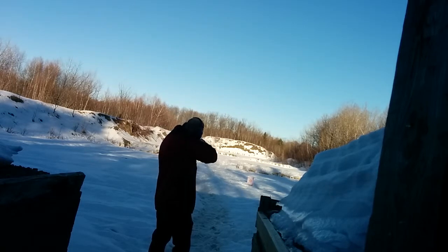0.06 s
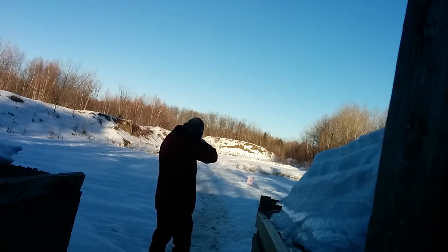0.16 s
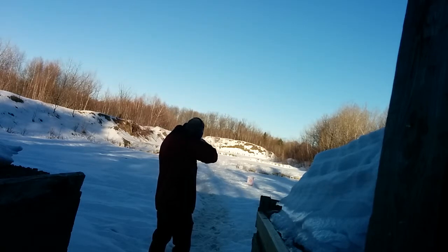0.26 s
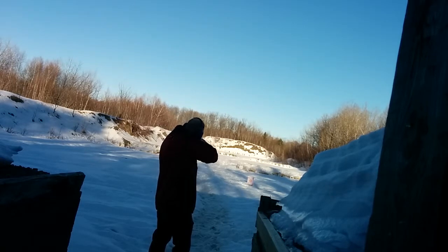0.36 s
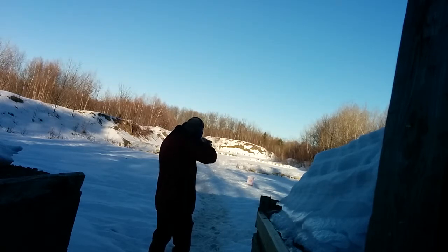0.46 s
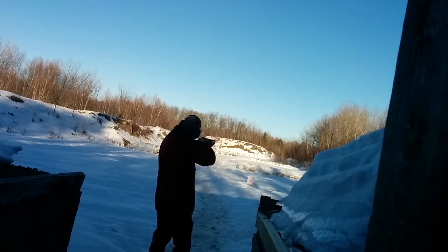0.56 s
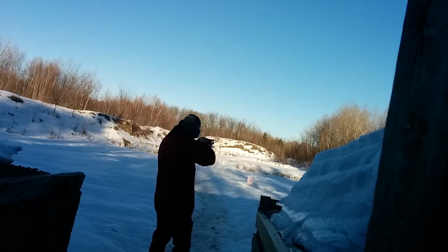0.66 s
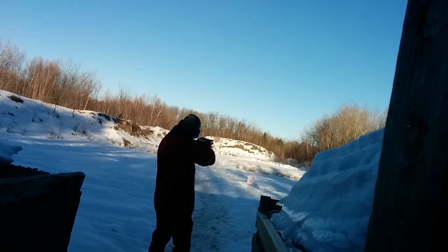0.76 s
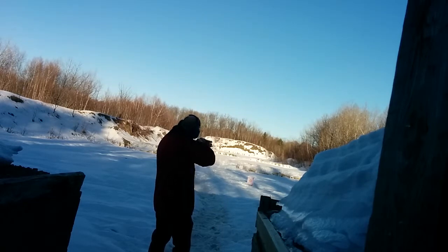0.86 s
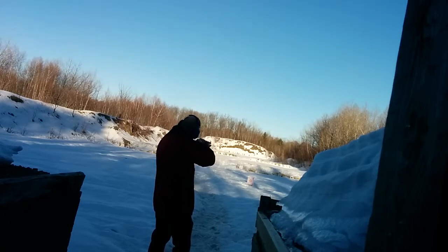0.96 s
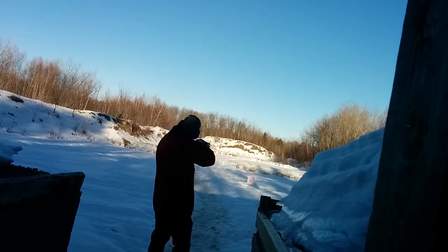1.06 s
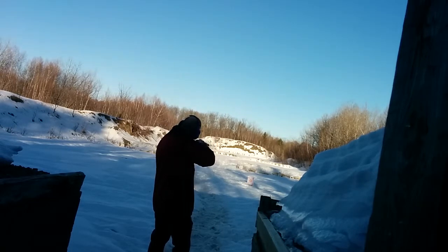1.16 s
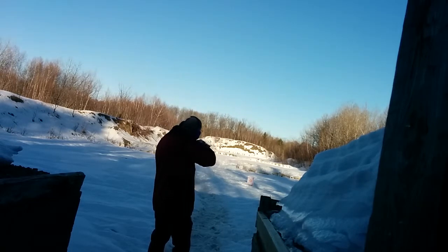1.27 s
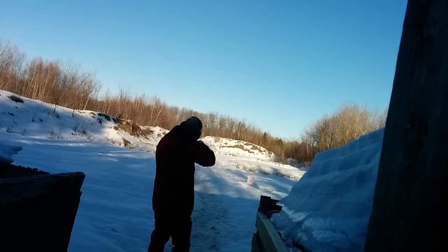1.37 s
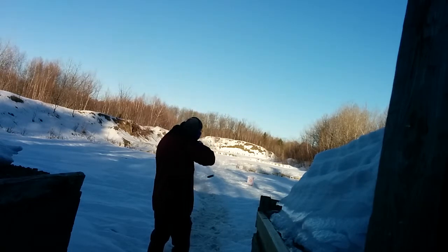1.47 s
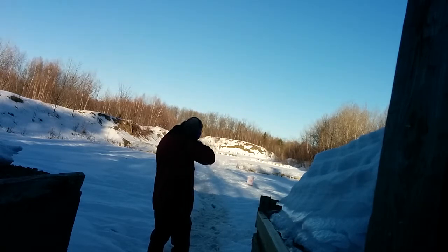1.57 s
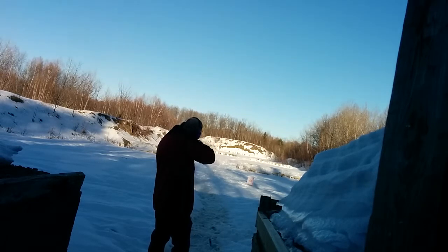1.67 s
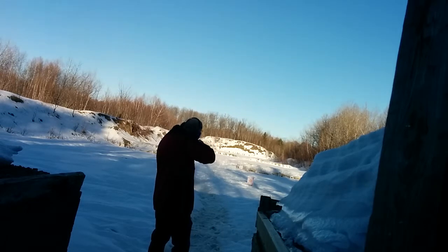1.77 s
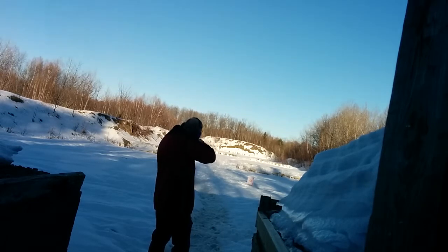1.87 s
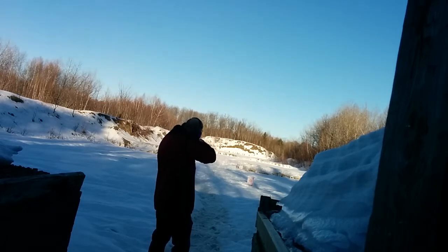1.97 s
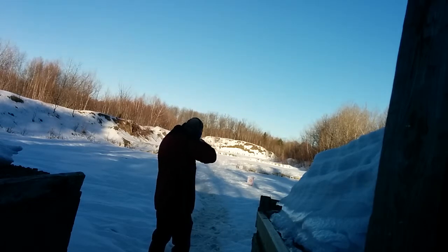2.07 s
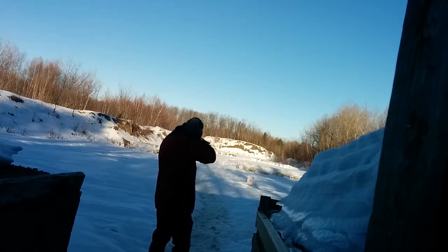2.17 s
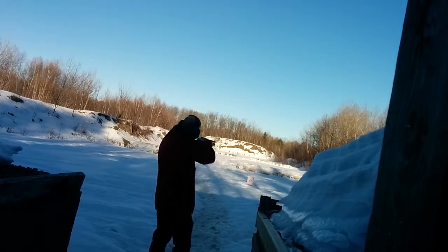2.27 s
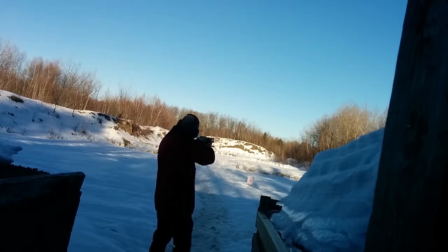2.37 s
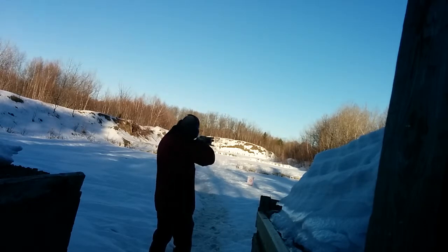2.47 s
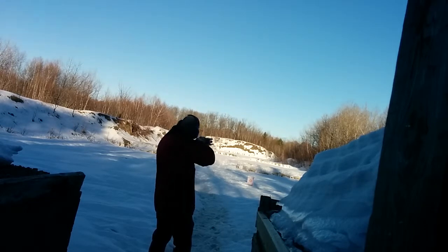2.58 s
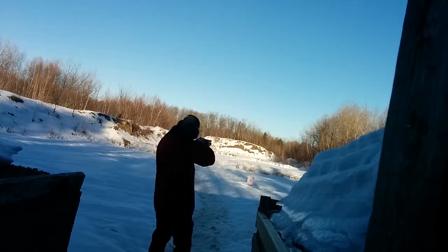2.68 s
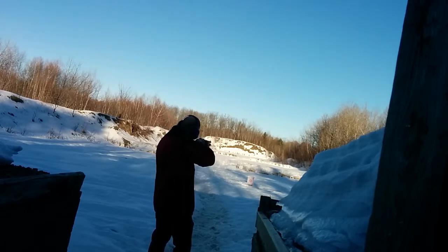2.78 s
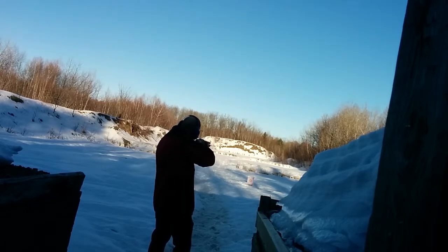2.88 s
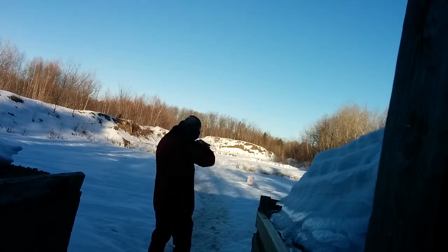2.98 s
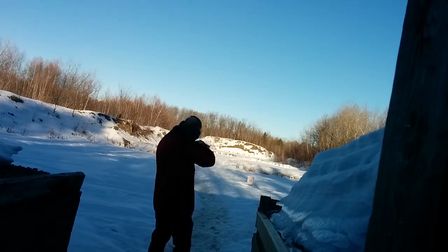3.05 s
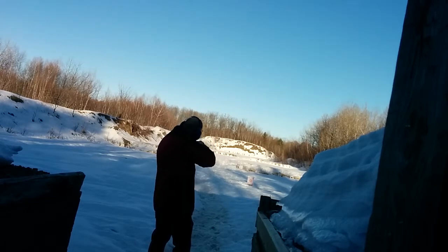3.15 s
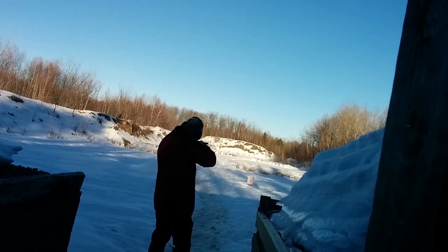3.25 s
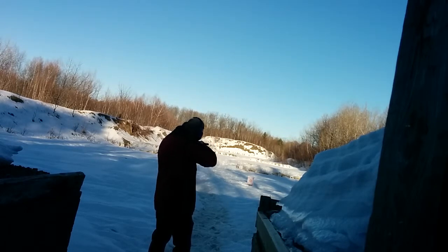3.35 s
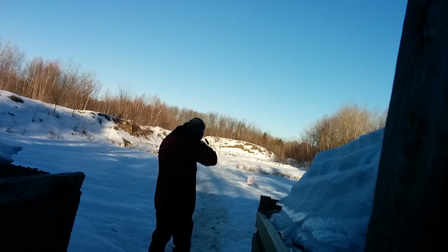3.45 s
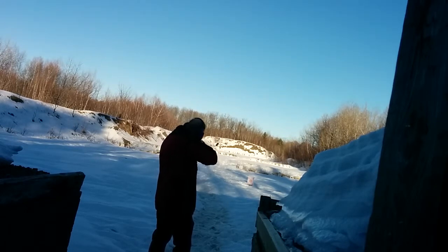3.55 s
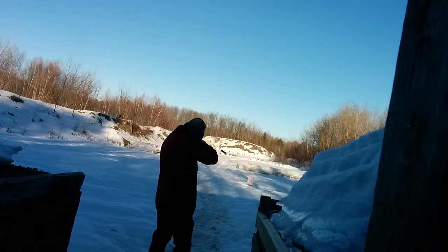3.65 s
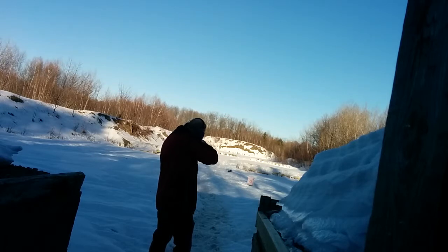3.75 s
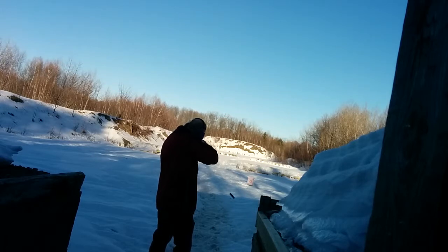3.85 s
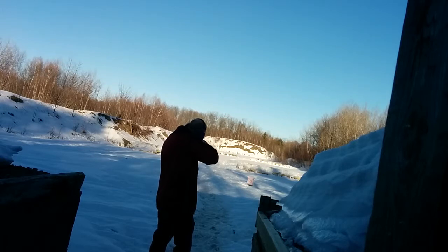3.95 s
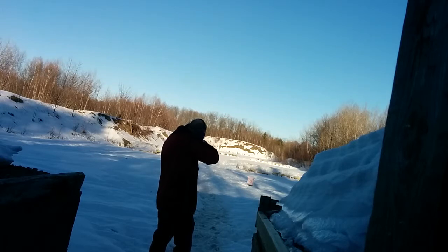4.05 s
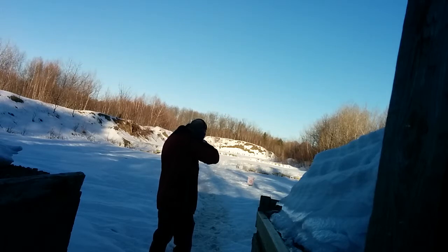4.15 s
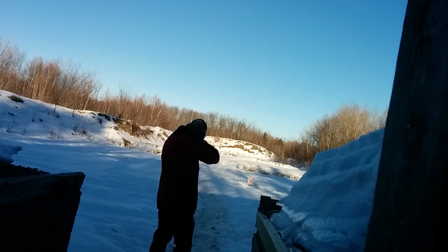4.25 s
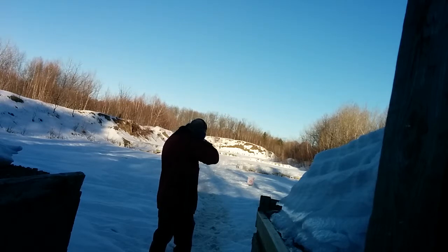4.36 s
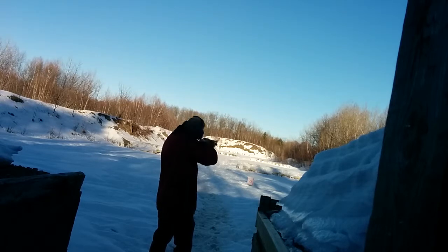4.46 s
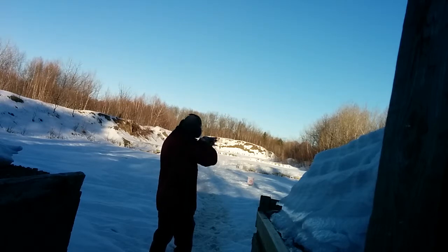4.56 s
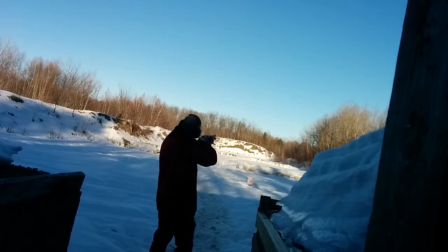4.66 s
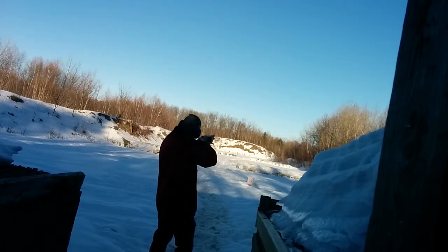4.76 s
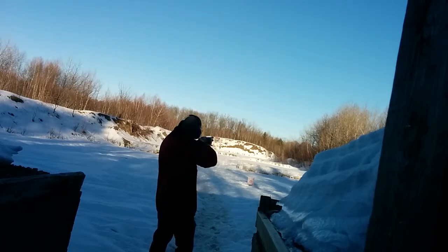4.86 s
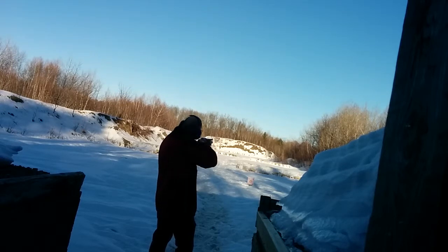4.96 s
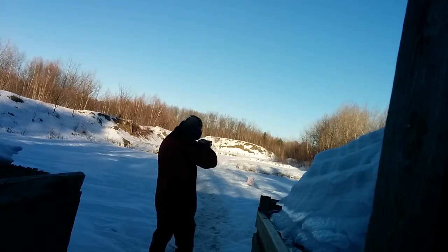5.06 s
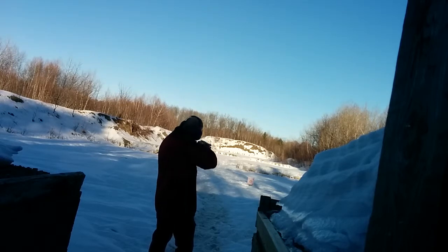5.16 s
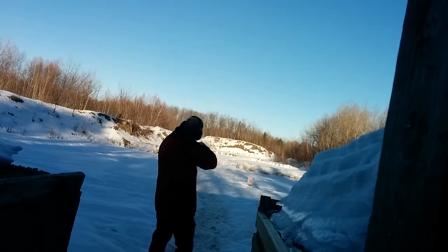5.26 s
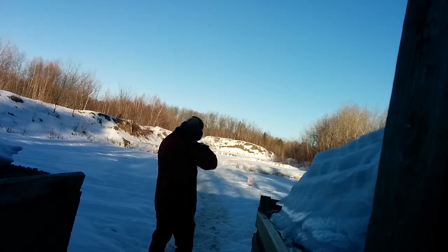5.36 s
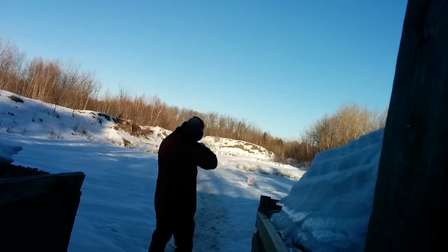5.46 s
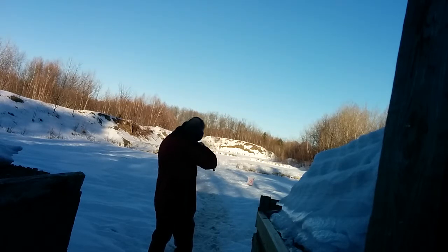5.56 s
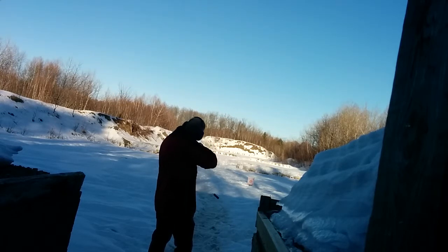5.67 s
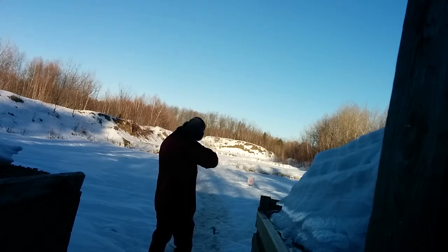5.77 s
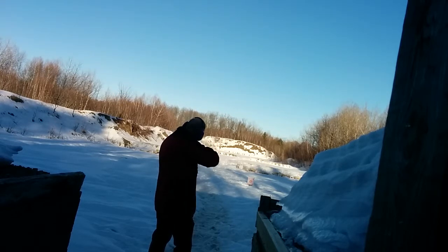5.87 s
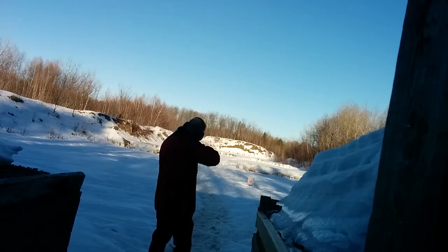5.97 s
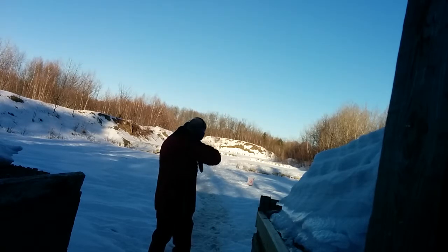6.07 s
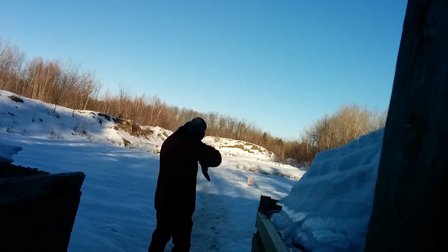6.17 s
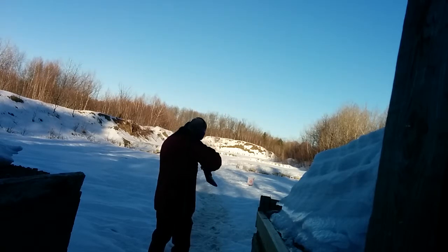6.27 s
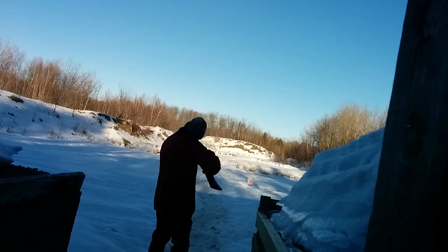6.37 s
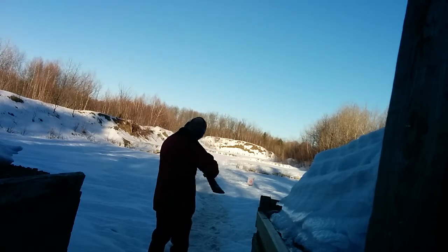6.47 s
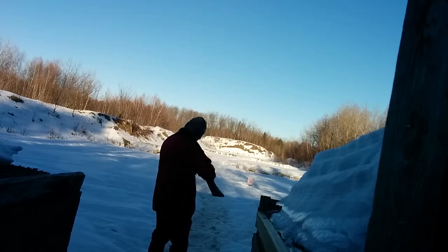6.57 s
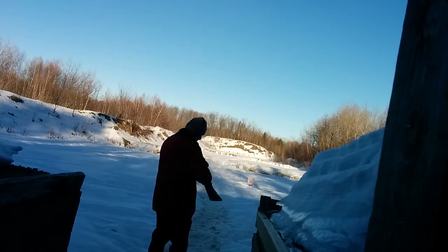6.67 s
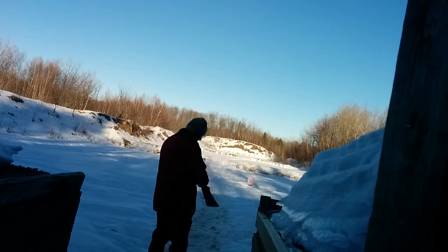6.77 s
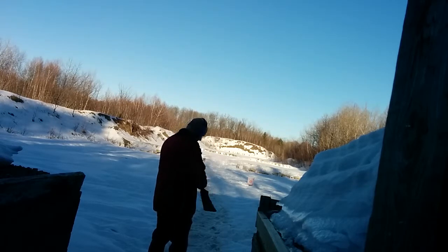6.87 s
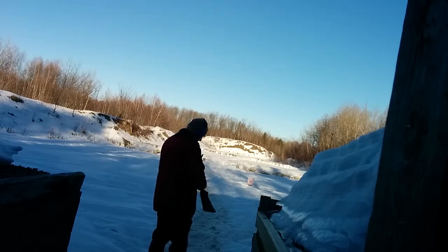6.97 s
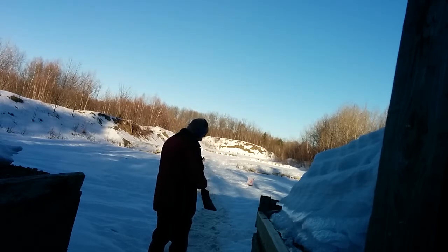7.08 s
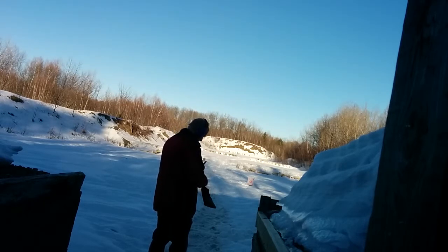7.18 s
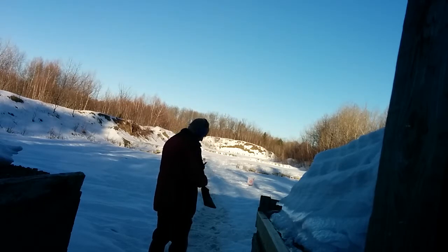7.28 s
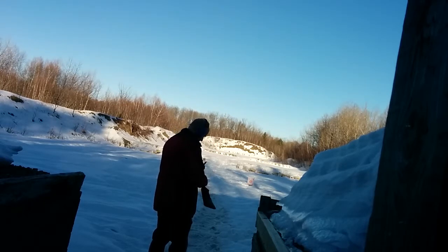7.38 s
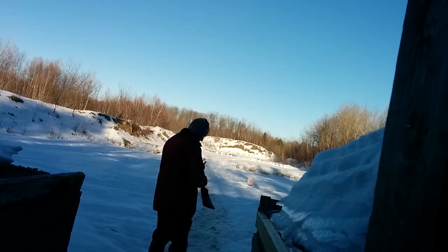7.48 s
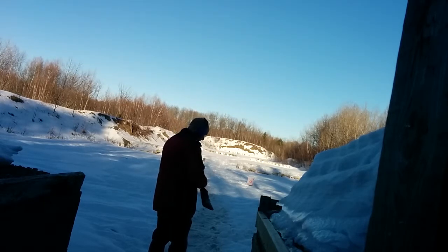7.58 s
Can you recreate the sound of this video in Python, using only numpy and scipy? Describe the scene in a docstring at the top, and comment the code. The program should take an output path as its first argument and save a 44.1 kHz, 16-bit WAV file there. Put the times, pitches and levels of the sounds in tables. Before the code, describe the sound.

In an open snowy pit, a phone a few metres behind the shooter catches three distorted shotgun blasts. Each cracks hard, returns as lumpy echoes and darkens into distant woods. Bright two-part metallic pump strokes cut through each tail. Dry, hollow snow crunches come before the first shot and between the first two. The end is quiet, with clicks, ticks and a final clack; tails are trimmed down to a low, faint air murmur.

```python
"""In a snowy pit, a few metres in front of a phone, a pump shotgun is fired three times.
Each blast is banded noise that overloads the microphone and rolls back from banks and woods, losing
treble; the tail of an earlier shot opens the scene. Noise bursts and short rings make the steel action
slide, clack and tick, and hollow grains of noise make boots crunch in dry snow.
The phone turns quiet moments down, so tails are cut short over a faint low murmur."""
import sys
import numpy as np
from scipy import signal
from scipy.fft import rfft, irfft, next_fast_len
from scipy.io import wavfile
from scipy.ndimage import uniform_filter1d, minimum_filter1d

SR = 44100
rng = np.random.default_rng(int(sys.argv[2]) if len(sys.argv) > 2 else 0)


def store_wav(level_fs):
    """Save 16-bit WAV to argv[1]."""
    pcm = np.round(np.clip(np.atleast_2d(level_fs), -1, 1) * 32767)
    wavfile.write(sys.argv[1], SR, pcm.T.astype(np.int16))


N = 336483
T = np.arange(N) / SR  # seconds

# The shots; the first was fired before the start and only its tail is left. Each row: time in seconds,
# late tail from the woods in dB, sharp echoes in dB, deep boom in dB.
SHOTS = [(-1.62, 2.5, 0, 0), (0.5174, 1.2, -1.5, 0.5), (2.306, -3, 0.6, -16), (4.487, 1.2, -2.5, -9)]
# Strokes of the fore-end, back and forward, each ending at its stop. Each row: main blow in seconds,
# its relative level in dB, looseness in dB, slide before it in seconds, relative end scrape level in dB.
BACK_STROKES = [(1.3985, -6, 4, .045, -32), (3.3977, -5, 3.2, .053, -43), (5.4814, -3.5, -.5, .053, -38),
                (7.3517, -5, -6, .125, -35)]
FORWARD_STROKES = [(1.6266, -4.5, .6, .117, -31.5), (3.6599, -3.5, -.6, .111, -34.5),
                   (5.7474, -5.5, .3, .1, -34)]
# Colour of the steel's scrape and crack. Each row: frequency in Hz, level in dB.
STEEL_COLOUR = [(1000, -19), (2200, 3), (3500, 2.5), (5200, 4.5), (6800, -0.5), (8000, -22.5), (14000, -39)]


def undb(db):
    """Turn decibels into an amplitude factor."""
    return 10 ** (np.asarray(db) / 20)


def shaped_noise(gain, size):
    """Filter white noise by a gain per frequency bin."""
    return irfft(rfft(rng.standard_normal(size)) * gain, size)


def band(hz, octaves, size):
    """Noise of rms 1 under a bell-shaped band, down to 1/e at this many octaves from its centre."""
    padded = next_fast_len(size, True)
    bins = np.fft.rfftfreq(padded, 1 / SR) + 1
    bell = np.exp(-(np.log2(bins / hz) / octaves) ** 2)
    x = shaped_noise(bell, padded)[:size]
    return x / np.std(x)


def coloured(spectrum, size):
    """Noise of rms 1 with a spectrum drawn through (Hz, dB) points."""
    hz, db = np.transpose(spectrum)
    bins = np.fft.rfftfreq(size, 1 / SR) + 1
    x = shaped_noise(undb(np.interp(np.log(bins), np.log(hz), db)), size)
    return x / np.std(x)


def walk(rate):
    """Random levels around 0, drawn `rate` times a second and joined by ramps."""
    k = int(SR / rate)
    steps = np.repeat(rng.standard_normal(N // k + 1), k)
    return uniform_filter1d(steps, k)[:N]


def fade(t, t60, rise):
    """A quick rise and an exponential fall of 60 dB in t60 seconds."""
    return (1 - np.exp(-t / rise)) * undb(-60 * t / t60)


def add(out, s, x):
    """Lay sound x into out from s seconds on."""
    i = int(s * SR)
    out[i:i + len(x)] += x[:N - i]


def blast_roll():
    """Slopes send the blast back; on longer paths the air and snow take more of the bass and treble."""
    # What the ground sends back. Each row: seconds after the shot, middle-register level in dB.
    roll = [(0, -20.5), (0.016, -12), (0.081, -18), (.17, -17.5), (.22, -21.5), (.33, -23), (.54, -33),
            (.556, -28), (.84, -35.5), (.94, -39), (1.03, -47), (1.17, -51), (1.4, -47), (1.6, -52),
            (2.0, -63), (3.2, -88)]
    # Colour of the returns against the roll. Each row: frequency in Hz, near banks in dB, their loss in
    # dB per second, far woods in dB, their loss in dB per unit of the settling path below.
    terrain = np.transpose([(38, -29, 49.5, -42, 10), (62, -21, 49.5, -35.5, 10),
                            (117.8, -13, 49.5, -40.5, 6), (259, -1.2, 44, -18, 2.5),
                            (510, -5.5, 35, -11, -5.5), (835.6, -7.5, 30.5, -6, 1), (1750, -13, 34, -9, 5),
                            (3498, -14.5, 30.5, -9.5, 18.5), (5097, -11, 35, -10, 50),
                            (6707, -5.5, 37, -18, 96), (9000, -5, 44, -47, 66),
                            (16400, -11, 61, -63.5, 72.5)])
    fired, woods_db, _, boom_db = np.transpose(SHOTS)
    last = np.searchsorted(fired, T, "right") - 1
    since = T - fired[last]
    late = np.minimum(since, 1)
    # long paths come from the same far woods, so the colour settles
    path = 1.3 * np.tanh(since ** 1.9 / 1.6)
    # single trees and ledges answer in short lumps, clearest in the low middle
    lumps = np.tanh(walk(110)) + np.tanh(walk(50))
    out = np.zeros(N)
    for hz in 38 * 2 ** np.arange(0, 8.8, 1 / 3):
        near_db, near_loss, far_db, far_loss = (
            np.interp(np.log(hz), np.log(terrain[0]), column) for column in terrain[1:])
        if hz < 90:
            near_db = near_db + .45 * boom_db[last]
        # the pit is small: its own returns hold, then run out, the highest first
        pit_db = -9 * (late / 0.29 * (hz / 8000) ** 0.067) ** 4
        near = undb(near_db - near_loss * since + pit_db)
        far = undb(far_db - far_loss * path + woods_db[last] * late ** 3)
        lump_db = 2.8 * lumps * np.exp(-(np.log2(hz / 650) / 2) ** 2)
        flicker_db = 2.3 * walk(25)
        out += np.hypot(near, far) * undb(lump_db + flicker_db) * band(hz, 1 / 5, size=N)
    return out * undb(np.interp(since, *np.transpose(roll)))


def blast_echoes():
    """Single echoes stand out of the roll as short bands of noise, each with a fainter band above it."""
    # Each row: seconds after the shot, relative level in dB, centre in Hz, 60 dB decay in seconds.
    echoes = [(.083, -10, 60, .13), (.101, -.6, 5200, .018), (.143, -5, 4360, .018),
              (.244, -2.2, 4400, .018), (.261, -9, 4660, .018), (.289, -8, 460, .085),
              (.338, -14, 780, .14), (.546, -11, 580, .17), (.63, -17, 507, .13), (.768, -24, 915, .11)]
    out, t = np.zeros(N), T[:SR // 3]
    for shot, woods, sharp, boom in SHOTS[1:]:
        for s, db, hz, t60 in echoes:
            db = db + (boom if hz < 90 else sharp if hz > 2000 else woods * s)
            noise = band(hz, 0.65, size=len(t)) + undb(-11) * band(2.3 * hz, 0.68, size=len(t))
            add(out, shot + s, undb(db - 5) * fade(t, t60, 0.025 * t60) * noise)
    return out


def shots():
    """A shot is its rolling return from the ground plus the echoes that stand out of it."""
    return blast_roll() + blast_echoes()


def clacks():
    """List every blow of steel on steel: those that end the strokes, and the single clicks."""
    # Blows within a back or forward stroke. Each row: seconds from the main blow, level against it in dB,
    # top sparkle in dB, rattle after the blow in dB.
    back_blows, forward_blows = [(-.01, -13.5, -17, -11), (0, 0, -.6, -19)], [(0, 0, 1.2, -23), (.0093, -2.5, -4, -18)]
    # Single parts click. Each row: seconds, relative level in dB, top sparkle in dB, rattle after in dB.
    blows = list([(1.4298, -12, 0, -16), (1.5319, -29.5, -3, -5.5), (1.5618, -18.5, -5.5, -11),
                  (3.3644, -27.5, -30, -9.5), (3.4184, -20, 2, -12.5), (3.4359, -26, -9, -6),
                  (3.5579, -35, -8.5, -8.5), (3.5775, -21, -3, -9.5), (3.5965, -17, -8, -9.5),
                  (5.658, -32, -18.5, -23), (5.689, -21, -24, -17), (6.0585, -25, -11, -22),
                  (6.0737, -12.5, 2.5, -25), (7.233, -22.5, -34, -21.5), (7.249, -16, -40, -24),
                  (7.2915, -18, -40, -28)])
    for strokes, pattern in ((BACK_STROKES, back_blows), (FORWARD_STROKES, forward_blows)):
        for s, db, loose_db, _, _ in strokes:
            for after, more_db, top_db, rattle_db in pattern:
                blows.append((s + after, db + more_db, top_db + loose_db / 2, rattle_db + loose_db))
    return blows


def steel_blows(chatter):
    """Each blow cracks and rings the steel; a rattling tail follows, cut short early."""
    # Ringing parts. Each row: frequency in Hz, relative level in dB, 60 dB decay in seconds.
    parts = [(846, -15, 0.07), (1764, -10.5, .06), (2820, -24.5, .06), (4390, -7.5, 0.079),
             (5020, -1.5, 0.017), (6310, 0.5, 0.023), (8870, -5.5, 0.066), (11770, -3.5, 0.043)]
    out, t = np.zeros(N), T[:SR // 5]
    crack = fade(t, .016, .0015)
    rattle = undb(-150 * t) * (undb(-13 * (t / 0.09) ** 3) + undb(-21)) * (1 - np.exp(-t / 0.0014))
    top_rattle = undb(-150 * t - 11 * (t / .075) ** 3) * (1 - np.exp(-t / 0.0023))
    for s, db, top_db, rattle_db in clacks():
        # only hard blows shake the whole gun and knock low
        knock_db = -6.5 + 0.5 * db
        body = coloured(STEEL_COLOUR, len(t)) + undb(knock_db) * band(904, 0.79, size=len(t))
        top = undb(top_db) * band(8400, 0.73, size=len(t))
        ring = np.zeros(len(t))
        for hz, part_db, t60 in parts:
            register_db = top_db if hz > 8000 else knock_db if hz < 1500 else 0
            level = undb(part_db + 5.2 * rng.standard_normal() + register_db)
            ring += level * fade(t, t60, .0005) * band(hz, 0.056, size=len(t))
        shake = undb(rattle_db) * chatter[int(s * SR):][:len(t)]
        tail = shake * (body * rattle + top * top_rattle)
        add(out, s, undb(db) * (undb(-4) * ((body + top) * crack + tail) + undb(-15) * ring))
    return out


def slides(chatter):
    """The fore-end scrapes along in uneven noise that swells up to its stop and runs a little past it."""
    swell_db, overrun_s = 9, .01
    out = np.zeros(N)
    for s, _, _, length, end_db in BACK_STROKES + FORWARD_STROKES:
        start, size = s - length, int((length + overrun_s) * SR)
        stroke = undb(np.linspace(end_db - swell_db, end_db, size)) * signal.windows.tukey(size, .25)
        add(out, start, stroke * coloured(STEEL_COLOUR, size) * chatter[int(start * SR):][:size])
    return out


def ticks():
    """Small parts tick as the gun is handled: a narrow band of noise over a wide, softer one."""
    # Each row: time in seconds, relative level in dB, frequency in Hz.
    tick_rows = [(0.2014, -42, 5150), (0.3324, -50, 3000), (1.946, -39, 4200), (1.956, -36, 5560),
                 (1.994, -33, 5600), (4.2373, -35, 5360), (4.324, -52, 6200), (4.3805, -48, 6300),
                 (6.271, -35, 5900), (6.2944, -44, 5860), (6.3335, -45, 5700), (6.769, -56, 5640)]
    out, t = np.zeros(N), T[:SR // 5]
    for s, db, hz in tick_rows:
        narrow = band(hz, 0.22, size=len(t)) * fade(t, 0.036, 0.0007)
        wide = undb(-7) * band(3800, 1.0, size=len(t)) * fade(t, 0.036, 0.0012)
        add(out, s, undb(db + 1) * (narrow + wide))
    return out


def action():
    """Blows, slides and ticks of the steel action, thinned of their lows."""
    # irregular bursts, shared by the rattles and the scrapes
    chatter = undb(2.6 * np.minimum(walk(350) ** 2, 3) - 3.5)
    steel = steel_blows(chatter) + ticks() + slides(chatter)
    return signal.sosfilt(signal.butter(2, 520, "high", fs=SR, output="sos"), steel)


def boots():
    """Short hollow grains as crust breaks, with rough overtones that differ from grain to grain."""
    # Boots pack the snow. Each row: time in seconds, relative level in dB, frequency in Hz.
    crunches = [(0.204, -34, 762), (0.249, -30, 860), (0.268, -27, 850), (0.291, -25, 585),
                (0.325, -29, 760), (0.39, -40, 560), (0.435, -41, 750), (1.831, -32, 860),
                (1.857, -28, 748), (1.879, -22, 535), (1.904, -30, 650), (1.932, -27, 740),
                (2.002, -31, 745), (2.054, -32, 770), (2.098, -30, 445), (2.179, -31, 748),
                (5.845, -33, 1100), (5.943, -33, 420), (7.173, -43, 800)]
    # Overtones of a crunch. Each row: frequency in Hz, width in octaves, relative level in dB.
    overtones = [(1395, 0.21, -15), (2160, 0.12, -18.5), (2700, 0.088, -25.5)]
    out, t = np.zeros(N), T[:SR // 10]
    # a softer grain follows each crunch, about 22 ms later and 7 dB down
    spread = rng.uniform(.5, 1.5, (len(crunches), 2))
    crumbs = [(s + .022 * a, db - 7 * b, hz) for (s, db, hz), (a, b) in zip(crunches, spread)]
    for s, db, hz in crunches + crumbs:
        grain = band(hz, 0.44, size=len(t))
        for over_hz, width, over_db in overtones:
            level = undb(over_db + 1.5 * rng.standard_normal())
            grain = grain + level * band(over_hz, width, size=len(t))
        add(out, s, undb(db - 6) * fade(t, 0.084, 0.001) * grain)
    return out


def air():
    """A faint floor of coloured noise with an unsteady murmur in the low middle."""
    # Colour of the floor. Each row: frequency in Hz, level in dB.
    floor = [(20, -8), (70, -3), (140, -9), (330, 0), (800, -8), (1900, -21), (5700, -19.5), (16000, -25)]
    murmur = undb(-8 + 6.0 * walk(14)) * band(800, .4, size=N)
    return undb(-75.5) * (coloured(floor, N) + murmur)


def gate(x):
    """Gain that stays open a moment after a loud sound and sinks when the level is under the threshold."""
    threshold_db, knee_db, depth_db = -43, 3.2, 16
    hold, slew = int(.03 * SR), int(.012 * SR)  # samples
    db = 10 * np.log10(np.maximum(uniform_filter1d(x ** 2, slew), 1e-12))
    # highest level over the hold time just past
    held = -minimum_filter1d(-db, hold, origin=(hold - 1) // 2)
    gain_db = -depth_db / (1 + np.exp((held - threshold_db) / knee_db))
    return undb(uniform_filter1d(gain_db, slew))


def scene():
    """Shots, steel action and boots together, on one channel."""
    return (shots() + action() + boots())[None]


def record(dry):
    """The microphone flattens the blasts, quiet moments sink to the floor, deep bass and top are cut."""
    full_scale = .54  # amplitude the overloaded microphone levels off at
    thin = signal.sosfilt(signal.butter(2, 45, "high", fs=SR, output="sos"), dry)
    loud = thin / (1 + np.abs(thin / full_scale) ** 4) ** (1 / 4)
    heard = loud * gate(loud) + air()
    return signal.sosfilt(signal.ellip(12, .2, 70, 15700, fs=SR, output="sos"), heard)


dry = scene()
out = record(dry)
store_wav(out)
```